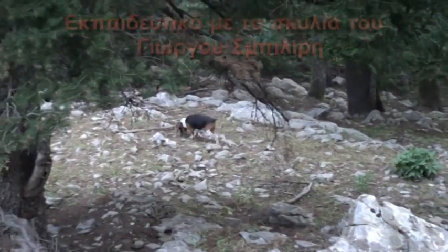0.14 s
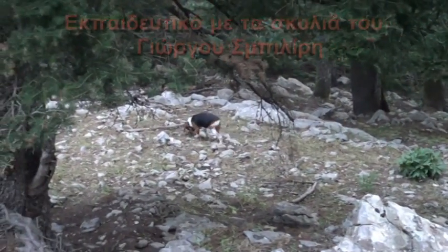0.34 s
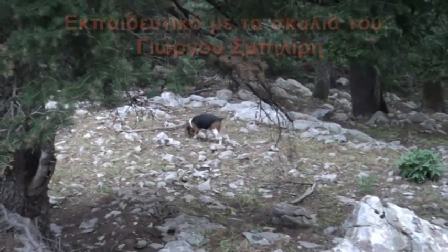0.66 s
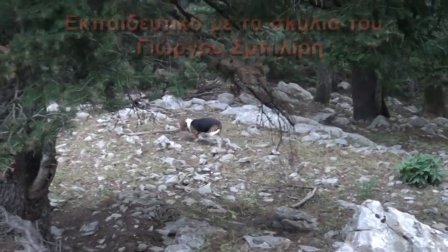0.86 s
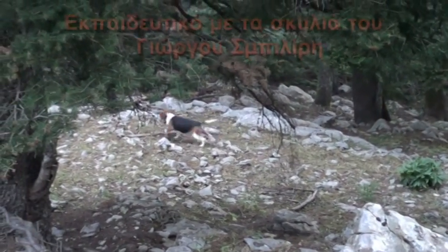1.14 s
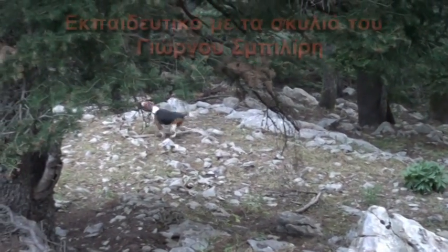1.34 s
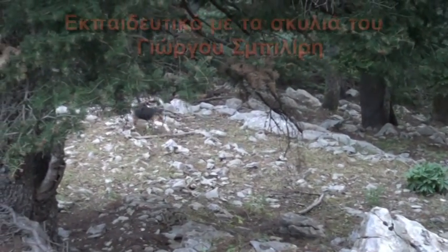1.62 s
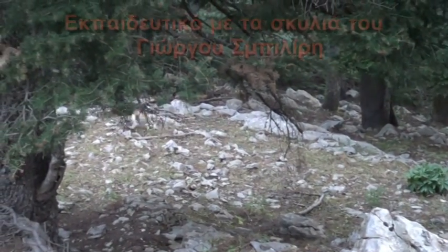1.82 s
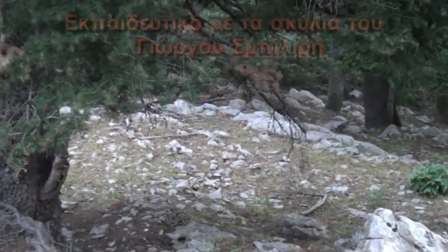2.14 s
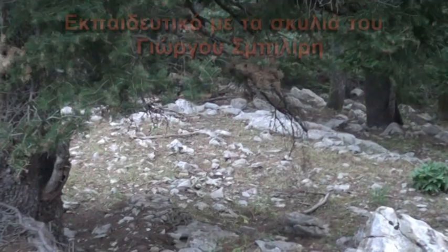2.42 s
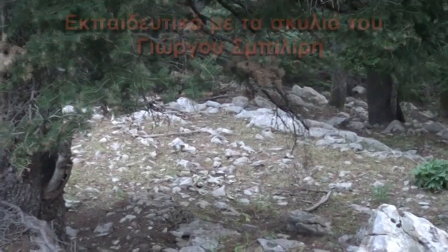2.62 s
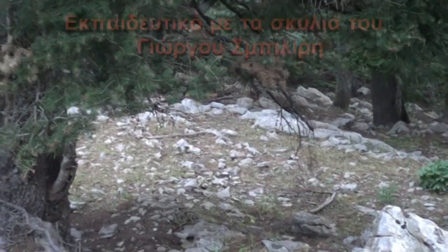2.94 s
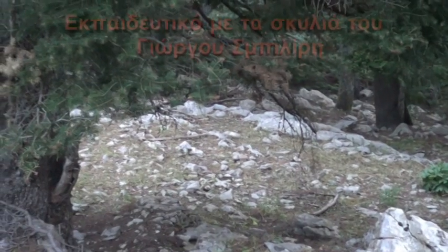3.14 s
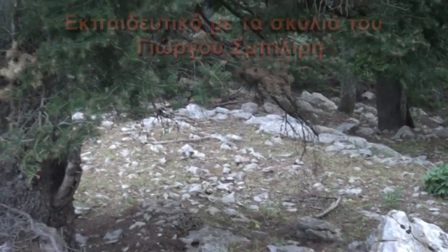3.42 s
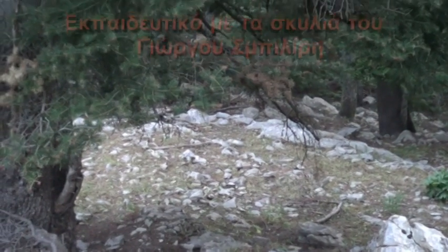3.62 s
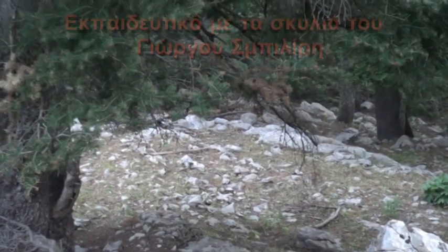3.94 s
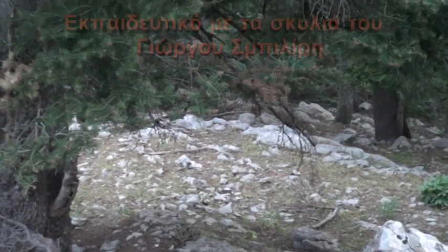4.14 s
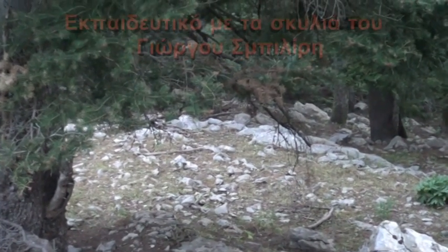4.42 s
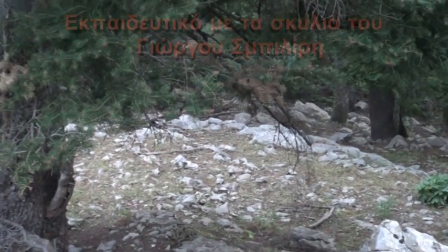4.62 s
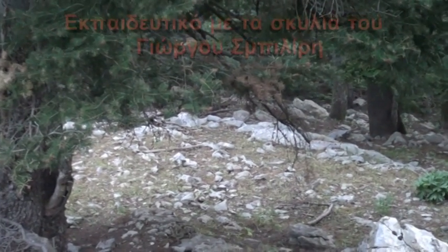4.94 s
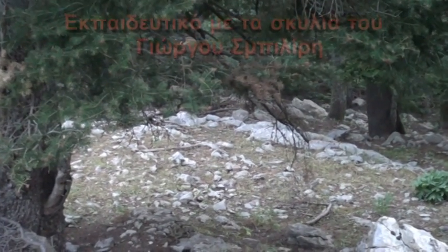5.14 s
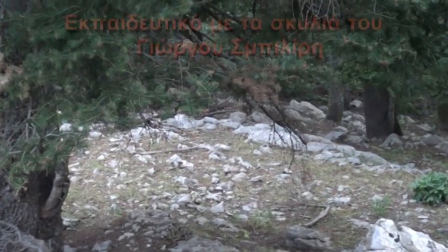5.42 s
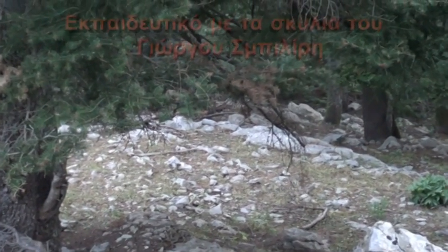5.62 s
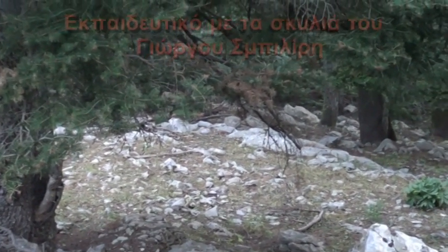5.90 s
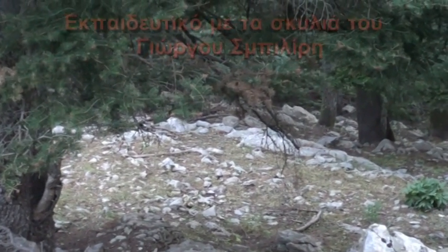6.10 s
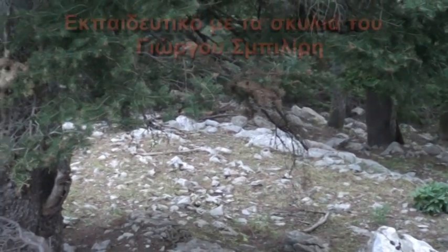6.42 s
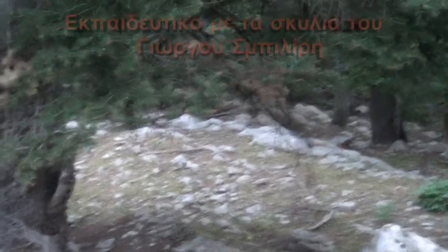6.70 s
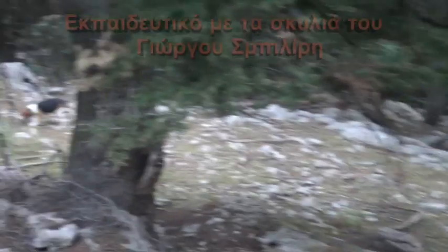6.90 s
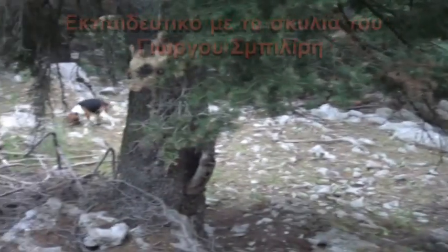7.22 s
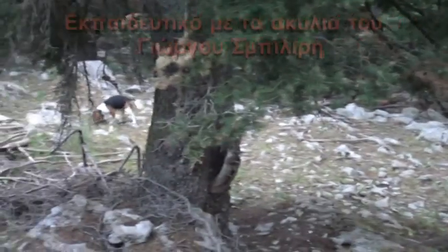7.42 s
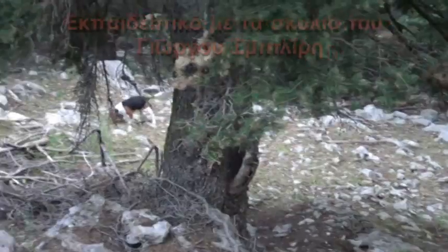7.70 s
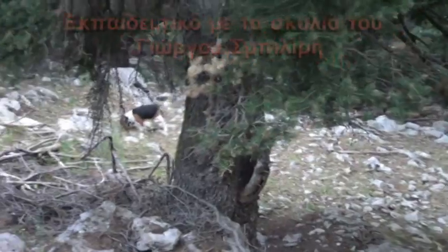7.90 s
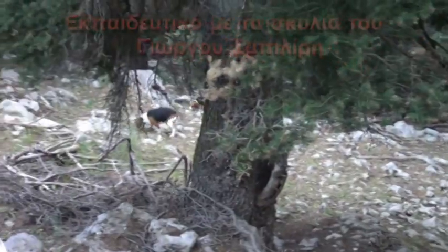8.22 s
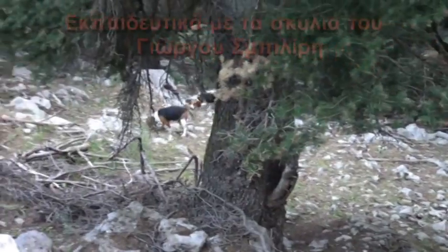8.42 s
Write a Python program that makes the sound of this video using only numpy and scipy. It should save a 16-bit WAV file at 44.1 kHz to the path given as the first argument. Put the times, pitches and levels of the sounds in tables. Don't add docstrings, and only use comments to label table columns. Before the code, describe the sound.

One hound yelps and bays loudly for under a second, its echo hanging in the valley. Around it, tinny clapper bells clatter with each uneven step, one bright and short, another softer and more ringing. Paws scuff gravel just before the bay. Later, held bird whistles, falling sweeps and quick chips fill the gaps. Quiet leaves, lumpy wind and blurred distant birdsong, open-air stereo with a very high faint whine.

```python
import sys
import numpy as np
from scipy import signal
from scipy.fft import rfft, irfft
from scipy.io import wavfile

SR = 44100
rng = np.random.default_rng(int(sys.argv[2]) if len(sys.argv) > 2 else 0)


def wrap_up_sound(samples):
    columns = np.atleast_2d(samples).T
    tamed = np.clip(columns, -1, 1)
    steps = np.round(tamed * 32767).astype(np.int16)
    wavfile.write(sys.argv[1], SR, steps)


def undo_db(level):
    steps = np.asarray(level, float) / 20
    return 10 ** steps


N = 377496

# t/s, f/Hz, first level/dB, second level/dB, third level/dB
BAY = [(1.272, 576, -44, -35, -41.5), (1.285, 588, -22.5, -13.5, -21.5), (1.298, 603, -20, -14, -27.5),
       (1.312, 648, -12.5, -27, -39), (1.34, 631.3, -18.5, -23, -36.5), (1.37, 616, -18.5, -30, -37.5),
       (1.4, 629, -14, -25.5, -37.5), (1.435, 628, -20, -31.5, -36.5), (1.465, 650, -11, -31, -43.5),
       (1.5, 648, -12.5, -27, -46.5), (1.54, 650.4, -10.5, -33, -47), (1.578, 660, -11, -31.5, -36.5),
       (1.61, 673.5, -19, -27.5, -38.5), (1.64, 669.4, -27, -32.5, -27.5), (1.675, 680, -18, -29, -38.5),
       (1.705, 681, -10.5, -34.5, -29.5), (1.735, 693, -15, -35, -31.5), (1.77, 687, -14.5, -31, -36.5),
       (1.81, 703, -12.5, -33, -24.5), (1.835, 711.5, -12.5, -40.5, -26), (1.86, 705, -12, -36.5, -36),
       (1.878, 670.3, -16.5, -27, -34), (1.9, 671, -16.5, -29, -25.5), (1.92, 678, -15, -34.5, -28),
       (1.95, 688.6, -23, -28, -27), (1.975, 589.4, -29, -44, -32.5), (1.995, 648.6, -35, -48, -55)]
# t/s, pair pitch f/Hz, low half line level/dB, high half line level/dB, roughness/0-1
RASP = [(1.272, 660, -26, -39.5, .15), (1.3, 680, -23.5, -42, 0.3), (1.315, 635, -22.5, -27, .45),
        (1.37, 598, -17.5, -28, .55), (1.4, 610, -26.5, -31.5, 0.5), (1.435, 610, -15, -28.5, .55),
        (1.47, 590, -28.5, -26.5, 0.4), (1.51, 580, -26, -32, 0.12), (1.57, 595, -47.5, -42, 0.06),
        (1.7, 630, -53.5, -49.5, 0.01), (1.8, 660, -40, -41.5, 0.12), (1.825, 661, -39, -25.5, 0.11),
        (1.878, 670, -30.5, -21, .3), (1.9, 665, -30, -27, 0.68), (1.925, 655, -30, -24.5, 0.33),
        (1.995, 660, -30, -49, 0.42)]
# multiple/1, level/dB
UPPER_PARTIALS = [(3, 1.5), (4, -14), (5, -26.5), (6, -28.5)]
# multiple/1, level/dB
HALF_PARTIALS = [(2.5, 0.5), (3.5, -10.5), (4.5, -23.5)]
# t/s, f/Hz, level/dB
YELP = [
    (1.223, 880, -35),
    (1.237, 948, -19.5),
    (1.242, 1006, -29.5),
    (1.249, 1097, -17),
    (1.265, 1053, -17.5),
    (1.277, 1010, -27.5),
]
# t/s, f/Hz, level/dB
ANSWER = [
    (3.495, 730, -53),
    (3.516, 876, -42.5),
    (3.529, 758, -47),
    (3.547, 794, -54),
    (3.56, 835, -45),
    (3.6, 800, -58.5),
    (3.661, 813, -53),
]
# multiple/1, level/dB
YELP_PARTIALS = [(1, 1.5), (2, -6), (3, -22), (4, -21)]
# f/Hz, level/dB
BREATH = [(500, -43), (1000, -0.5), (2800, -11), (3300, -27), (7500, -24), (11000, -44)]

# t/s, upper modes level/dB, hum level/dB, side mode level/dB, face mode level/dB,
# top modes level/dB
NEAR_BLOWS = [(0.2039, -25, -22, -27, -49, -38.5), (0.3621, -44, -28.5, -66, -49, -64),
              (0.382, -38.5, -45, -63, -52.5, -62), (0.5237, -25, -32.5, -46.5, -63, -51),
              (0.7402, -46, -63, -62, -66, -57), (0.8535, -20, -40, -38, -55, -47),
              (0.8794, -29, -46, -41, -56, -49), (0.9218, -23, -21.5, -29, -38, -42),
              (1.0101, -24, -31, -42, -54, -49.5), (1.0924, -44.5, -49, -56, -57, -59),
              (1.1383, -26, -36, -34, -54, -51), (1.1483, -38, -28, -36, -47, -37),
              (1.1682, -20, -26.5, -62, -41, -52), (1.3244, -39.5, -46, -42, -48.5, -51),
              (1.6312, -32.5, -27.5, -37, -52, -42.5), (1.8547, -32, -20.5, -37.5, -43, -45),
              (2.0328, -38, -32, -45, -45, -59), (2.0847, -29, -23.5, -57, -39.5, -54),
              (2.4813, -52, -44, -57, -57, -66), (2.5102, -33.5, -40, -39, -51, -53),
              (2.5381, -31, -24, -44, -37.5, -47), (2.6728, -31, -30, -55, -41.5, -49),
              (2.7536, -48, -45, -55, -60, -68), (2.8145, -28, -25, -55, -38.5, -52),
              (2.9402, -39, -37.5, -51, -50.5, -50.5), (3.015, -47, -41, -59, -50, -54),
              (3.0584, -32.5, -43, -42, -46.5, -55), (3.1263, -30, -22, -56, -41, -49),
              (3.1804, -51, -34.5, -51, -64, -65), (3.3498, -21, -34.5, -41.5, -42, -42),
              (3.5394, -38.5, -39.5, -45.5, -58, -55), (3.6451, -37, -27.5, -35.5, -50, -46),
              (3.7633, -33, -32, -49, -49.5, -44.5), (3.8327, -38.5, -34.5, -42, -68, -56),
              (3.8994, -43.5, -35, -52, -55, -62), (4.1121, -29.5, -52, -45, -49.5, -45.5),
              (4.1799, -43, -49.5, -53, -66, -61), (4.2194, -52.5, -34.5, -54, -59, -64),
              (4.2617, -43.5, -45.5, -51.5, -64, -55), (4.3984, -25, -40.5, -47.5, -45.5, -38.5),
              (4.6583, -35, -32, -62, -52.5, -53), (4.7985, -36, -42.5, -46, -56, -52.5),
              (4.8908, -38.5, -43, -46, -54.5, -62.5), (5.0709, -44.5, -34.5, -47, -56, -50.5),
              (5.226, -41, -33, -51.5, -54.5, -58.5), (5.4076, -38, -29, -54, -56, -52),
              (5.4849, -48.5, -40, -38, -67, -49), (5.5004, -33, -21.5, -57, -47.5, -50),
              (5.5982, -34.5, -33, -43.5, -52, -49), (5.9708, -41.5, -36, -59.5, -59, -59),
              (6.3385, -44, -43.5, -49, -52, -51), (6.3694, -36, -30.5, -44, -76, -45),
              (6.4044, -46, -48, -43, -52, -56), (6.549, -27.5, -45.5, -31.5, -69, -46),
              (6.7595, -30, -32.5, -33.5, -63, -36.5), (6.8064, -37, -33.5, -36, -63, -43),
              (6.981, -41, -67, -54.5, -61.5, -54), (7.4165, -31.5, -42, -31.5, -59.5, -35.5),
              (7.5857, -20, -34.5, -38.5, -43.5, -30.5), (8.3085, -44, -48, -48, -59, -55),
              (8.3285, -29, -30, -26, -47.5, -43)]
# f/Hz, level/dB against its group, t60/s
NEAR_BELL = [(2031, 1, 0.19), (3458, 4.5, 0.17), (4823, -2, 0.27), (4742, -10.5, .15), (5602, 7.5, 0.25),
             (7244, -17.5, 0.15), (7790, -16.5, 0.32), (8140, -17, 0.12), (8740, -17, 0.15),
             (8900, -15.5, 0.15), (9620, -21, 0.17), (11100, -1, 0.12), (11675, -6, 0.17),
             (12900, -8.5, 0.14), (12950, -12.5, .2), (14020, -15.5, .13), (14930, -15, .15),
             (15320, -12.5, .11)]
NEAR_GROUPS = [2, 4, 3, 3, 4, 1, 1, 1, 1, 1, 1, 5, 5, 5, 5, 5, 5, 5]
# t/s, top mode level/dB, hum level/dB, second hum level/dB, face mode level/dB
FAR_BLOWS = [(0.0094, -49, -43.5, -57, -48), (0.2039, -44, -41.5, -62, -48), (0.5237, -69, -44.5, -72, -59),
             (0.7457, -69, -50, -58, -73), (1.0504, -62, -43, -53, -52), (1.1682, -44, -54, -58, -41),
             (2.5601, -54, -55, -63, -66), (2.8734, -46, -48, -55, -50), (3.0165, -52, -53, -51, -47),
             (3.2859, -46, -46, -59, -55), (3.5074, -54, -45.5, -58, -63), (3.8004, -40, -46.5, -53, -50.5),
             (4.0272, -39, -43, -53, -47.5), (4.3071, -63, -57, -62, -54), (4.5082, -56, -48.5, -52.5, -52),
             (4.7234, -55, -52, -68, -67), (6.2694, -64, -60, -67, -58.5), (7.1811, -59, -61.5, -74, -59.5),
             (7.3382, -63, -56, -59, -56.5), (7.5338, -49, -56.5, -50, -55), (7.6949, -44, -53, -47, -47),
             (7.7243, -38, -52, -57, -46), (7.7628, -34.5, -42.5, -52.5, -37),
             (8.1878, -60, -57.5, -65, -55)]
# f/Hz, level/dB against its group, t60/s
FAR_BELL = [(2176, 6, 0.82), (2333, 3.5, .5), (5060, -8, .4), (5280, 7.5, 0.26), (9400, -2, 0.12)]
FAR_GROUPS = [2, 3, 4, 4, 1]

# t/s, level/dB
SCUFF = [
    (.8, -56),
    (.816, -39.5),
    (.84, -33.5),
    (.87, -43),
    (.93, -51),
]
# f/Hz, level/dB per Hz
GRAVEL = [(88, -42.5), (150, -10), (866, -8), (991, -12), (1950, 0.5), (3820, -13), (10000, -19.5),
          (15000, -32)]
# t/s, f/Hz, level/dB
SQUEAK = [
    (.72, 7900, -53),
    (.745, 8860, -55),
    (.775, 7800, -62),
]

# t/s, f/Hz, level/dB
WHISTLES = [
    [(4.53, 4350, -49.5), (4.612, 4540, -48.5), (4.758, 4440, -66.5)],
    [(4.883, 4341, -48), (4.997, 4393, -46), (5.145, 4380, -54)],
    [(5.24, 4360, -64.5), (5.408, 4275, -47), (5.518, 4450, -68)],
    [(5.591, 4170, -74), (5.665, 4295, -45), (5.906, 4386, -61)],
    [(5.964, 4290, -70), (6.05, 4420, -44.5), (6.227, 4290, -66)],
    [(6.348, 4250, -47.5), (6.402, 4356, -48), (6.596, 4350, -60)],
    [(6.912, 4400, -66), (6.998, 4320, -55.5), (7.017, 4349, -76)],
    [(7.25, 4344, -56), (7.286, 4460, -56.5), (7.34, 4359, -56)],
]
# t/s from start, f/Hz, level/dB
SWEEP = [(0, 7610, -9), (.012, 6300, -0.5), (.025, 5300, -2), (.04, 5100, 0)]
# t/s, level/dB
SWEEPS = [
    (4.76, -49),
    (5.117, -43.5),
    (5.483, -45),
    (5.845, -45.5),
    (6.221, -49),
]
# t/s from start, f/Hz, level/dB
CHIP = [(0, 3490, -3), (.006, 2877, 1), (.016, 2600, 2.5)]
# t/s, level/dB
CHIPS = [
    (6.2, -45.5),
    (6.338, -45),
    (6.479, -45.5),
    (6.616, -48),
    (6.772, -53.5),
    (6.919, -51),
    (7.068, -49.5),
    (7.21, -52),
]
# t/s from start, f/Hz, level/dB
ARCH = [(0, 3236, -2), (.012, 4070, 0.5), (.022, 4020, -4), (.03, 3460, -2), (.045, 2950, 2),
        (.06, 2870, 2)]
# t/s, level/dB
ARCHES = [
    (2.125, -56),
    (2.275, -54.5),
    (2.421, -54),
    (8.003, -52.5),
    (8.145, -51.5),
    (8.295, -52),
    (8.442, -50),
]
# t/s from start, f/Hz, level/dB
RISE = [(0, 2444, -5), (.03, 2920, 5), (.06, 4400, -13)]
# t/s, level/dB
RISES = [
    (2.589, -55),
    (3.94, -52),
]

# f/Hz, t60/s
VALLEY_T60 = [(300, 1.2), (700, 2.26), (1500, 1.4), (3000, 1), (8000, 0.5)]
# t/s, wind level/dB, far birdsong level/dB
AIR = [(0, -70, -65), (.8, -71.5, -72), (1.4, -68, -63), (2.1, -82.5, -58.5), (3.1, -71, -49.5),
       (3.351, -54, -56.5), (3.6, -72, -52), (4, -72.5, -51.5), (5.2, -71, -55), (5.6, -71, -58.5),
       (6.9, -72, -76), (8.56, -66.5, -57.5)]
# f/Hz, level/dB
WOOD = [(18, -34), (30, -11.5), (273, -1.5), (760, -4), (937, -7.5), (2010, -2), (3580, -11), (4300, -7),
        (4650, -7.5), (9460, -10.5), (16000, -23.5)]
# f/Hz, likeness/0-1
LIKENESS = [(40, 1), (150, 0.45), (500, 0.49), (1600, 0.4), (5000, 0.63), (11000, 0.92)]
# f/Hz, level/dB
GUSTS = [(15, -12), (50, -6.5), (120, -7), (300, -34)]
# f/Hz, level/dB
FAR_SONG = [(2300, -38), (2900, -1.5), (3900, 0.5), (4500, -5.5), (5500, -31.5)]


def hound():
    out = np.zeros(N)
    at, gate, (hz, first_db, second_db, third_db) = in_time(BAY)
    pair_hz, low_db, high_db, rough = in_time(RASP)[2]
    rough = np.clip(rough, 0, 1)
    phase = turning(hz)
    pairs = turning(pair_hz[:len(hz)])
    voice = undo_db(first_db) * partials(phase, [(1, 0.0009)], 0.5 * rough)
    voice += undo_db(second_db) * partials(phase, [(2, 0.0059)], rough)
    voice += undo_db(third_db) * partials(phase, UPPER_PARTIALS, rough)
    voice += undo_db(low_db) * partials(pairs, [(1.5, 0)], rough)
    voice += undo_db(high_db) * partials(pairs, HALF_PARTIALS, rough)
    breath = undo_db(high_db + 3.0) * rough * shaped_noise(BREATH, len(gate))
    add(out, at, gate * (voice + breath))
    for cry in YELP, ANSWER:
        at, gate, (hz, level_db) = in_time(cry)
        add(out, at, gate * undo_db(level_db) * partials(turning(hz), YELP_PARTIALS, 0.15))
    return out


def partials(phase, table, rough):
    out = 0
    for k, level_db in table:
        wobble = drift(56, len(phase)) + 1j * drift(70, len(phase))
        shake = 0.97 * rough * np.sqrt(k) * wobble
        steady = np.sqrt(1 + 1.3 * k * rough ** 2)
        out = out + undo_db(level_db) * np.imag((1 + shake) / steady * np.exp(1j * k * phase))
    return np.sqrt(2) * out


def bell(blows, modes, groups, spread_db, clank_db, swing_db):
    blows = np.array(blows)
    out = np.zeros((2, N))
    at = np.round(blows[:, 0] * SR).astype(int)
    chance = rng.standard_normal((len(blows), len(modes)))
    for k, (hz, level_db, t60) in enumerate(modes):
        spread = spread_db * chance[:, k] * (level_db < 0)
        clicks = np.full(N, 1e-18)
        clicks[at] = undo_db(blows[:, groups[k]] + level_db + spread)
        mode = ring(clicks, hz, t60) + 0.63 * ring(clicks, hz * 0.991, 0.31 * t60)
        swing = undo_db(swing_db * np.sqrt(hz / 5000) * drift(25, N))
        aside = 0.3 * drift(4, N) * (hz < 10000)
        out += mode * swing * (1 + aside * [[1], [-1]])
    cavity = np.full(N, 1e-18)
    cavity[at] = undo_db(blows[:, 2] + clank_db)
    out += ring(cavity, 1830, 0.061)
    return signal.sosfilt(signal.butter(4, 1500, "high", fs=SR, output="sos"), out)


def ring(clicks, hz, t60):
    r, w = undo_db(-60 / (t60 * SR)), 2 * np.pi * hz / SR
    return signal.lfilter([0, np.sin(w)], [1, -2 * r * np.cos(w), r * r], clicks)


def paws():
    out = np.zeros(N)
    at, gate, (level_db,) = in_time(SCUFF)
    grit = undo_db(1.8 * drift(300, len(gate))) * shaped_noise(GRAVEL, len(gate))
    add(out, at, gate * undo_db(level_db + 4.5) * grit)
    add(out, *whistle(SQUEAK))
    add(out, *whistle(np.array(SQUEAK) * [1, 0.76, 1]))
    return out


def birds():
    out = np.zeros(N)
    for note in WHISTLES:
        add(out, *whistle(note, rough=0.38))
    for shape, repeats in (SWEEP, SWEEPS), (CHIP, CHIPS), (ARCH, ARCHES), (RISE, RISES):
        for s, level_db in repeats:
            add(out, *whistle(shape, s, level_db))
    return out


def whistle(rows, start=0, level_db=0, rough=0.5):
    at, gate, (hz, shape_db) = in_time(rows, start)
    return at, gate * undo_db(level_db + shape_db) * partials(turning(hz), [(0.98, 0)], rough)


def valley(x):
    f, t, z = signal.stft(rng.standard_normal((2, 3 * SR)), SR, nperseg=512)
    decay = undo_db(-60 * t / at_hz(VALLEY_T60, f + 1)[:, None])
    tail = signal.istft(z * decay * np.clip(t / 0.017, 0, 1), SR, nperseg=512)[1]
    tail = tail / np.sqrt(np.sum(tail ** 2, axis=1, keepdims=True))
    return signal.fftconvolve(x[None], tail, axes=1)[:, :N]


def air():
    t = np.arange(N) / SR
    s, wind_db, song_db = np.transpose(AIR)
    alike = np.clip(at_hz(LIKENESS, np.fft.rfftfreq(N, 1 / SR) + 1), 0, 1)
    mid = np.sqrt((1 + alike) / 2) * rfft(shaped_noise(WOOD, N))
    side = np.sqrt((1 - alike) / 2) * rfft(shaped_noise(WOOD, N))
    rustle = undo_db(-56 + 3.5 + 1.5 * drift(2.6, N)) * irfft(mid + side * [[1], [-1]], N)
    gusts = shaped_noise(GUSTS, 2 * N).reshape(2, N)
    gusts = gusts + 0.67 * gusts[::-1]
    wind = undo_db(np.interp(t, s, wind_db) + 2.5 * drift(8, N)) * gusts
    blur = shaped_noise(FAR_SONG, 2 * N).reshape(2, N)
    song = undo_db(np.interp(t, s, song_db) + 3.8 * drift(20, N)) * blur
    return rustle + wind + song


def at_hz(points, hz):
    table_hz, value = np.transpose(points)
    return np.interp(np.log(hz), np.log(table_hz), value)


def rms_one(x):
    return x / np.sqrt(np.mean(x ** 2) + 1e-20)


def turning(hz):
    return 2 * np.pi * np.cumsum(hz) / SR


def in_time(rows, start=0, fade=0.0016):
    s, *columns = np.transpose(rows)
    t = np.arange(s[0], min(s[-1], N / SR - start - 1e-3), 1 / SR)
    gate = np.clip(np.minimum(t - t[0], t[-1] - t) / fade, 0, 1)
    return round((s[0] + start) * SR), gate, [np.interp(t, s, c) for c in columns]


def drift(rate, count):
    r = np.exp(-2 * np.pi * rate / SR)
    wander = signal.lfilter([1], [1, -2 * r, r * r], rng.standard_normal(count + SR))
    return rms_one(wander[SR:])


def shaped_noise(spectrum, count):
    hz = np.fft.rfftfreq(count, 1 / SR) + 1
    return rms_one(irfft(rfft(rng.standard_normal(count)) * undo_db(at_hz(spectrum, hz)), count))


def add(out, at, x):
    out[..., at:at + x.shape[-1]] += x[..., :N - at]


def pan(x, left_db):
    return x * undo_db([[left_db], [-left_db]])


def scene():
    dog = hound()
    near = bell(NEAR_BLOWS, NEAR_BELL, NEAR_GROUPS, spread_db=6.0, clank_db=-9, swing_db=3.0)
    far = bell(FAR_BLOWS, FAR_BELL, FAR_GROUPS, spread_db=3.0, clank_db=-5.5, swing_db=2.0)
    feet, song = paws(), birds()
    dry = pan(dog, -0.4) + pan(near + feet, 0.6) + pan(far, 0.4) + pan(song, 1.5)
    ground = (near + far).mean(axis=0) + feet
    wet = valley(undo_db(-17) * dog + undo_db(-12) * ground + undo_db(-5.5) * song)
    return dry + wet + air()


def low_pass(x):
    return signal.sosfilt(signal.butter(12, 16530, fs=SR, output="sos"), x)


def record(dry):
    whine = undo_db(-66) * np.sin(2 * np.pi * 15625 * np.arange(N) / SR)
    top_cut = signal.cheby2(10, 30, 15750 + 300, fs=SR, output="sos")
    mix = signal.sosfilt(top_cut, dry + whine)
    return low_pass(mix)


dry = scene()
out = record(dry)
wrap_up_sound(out)
```